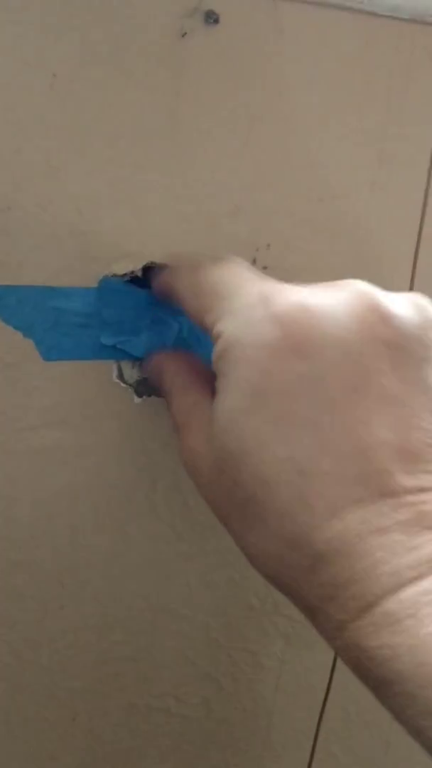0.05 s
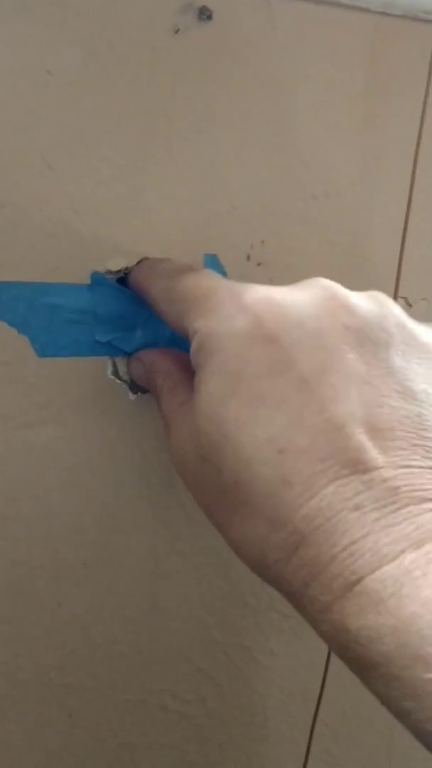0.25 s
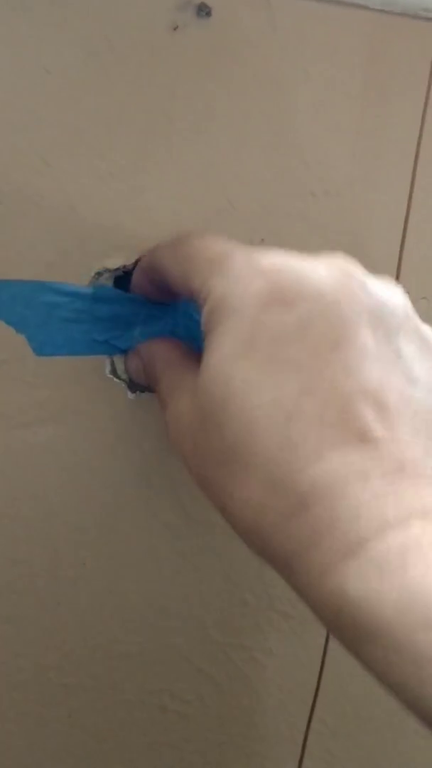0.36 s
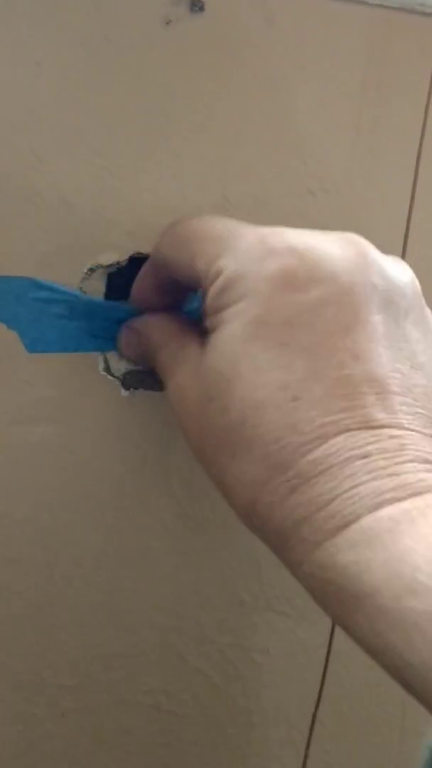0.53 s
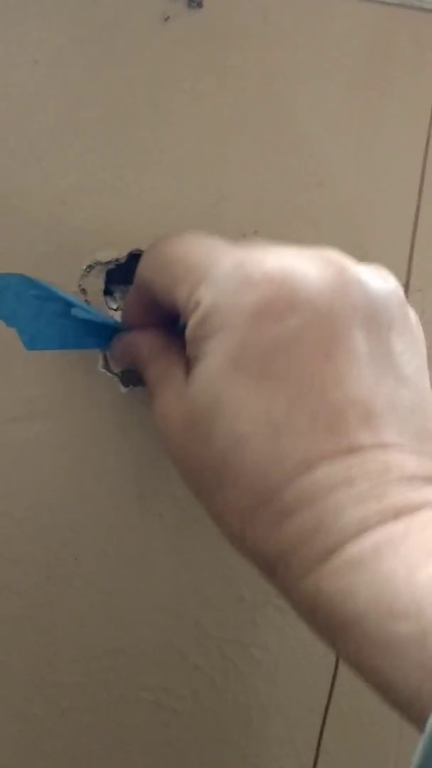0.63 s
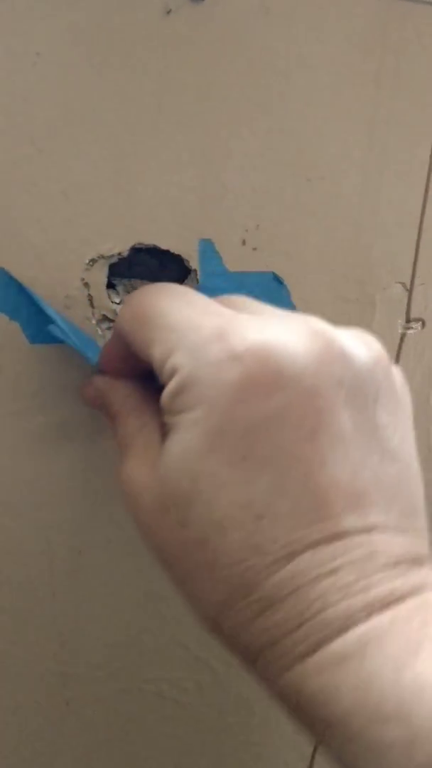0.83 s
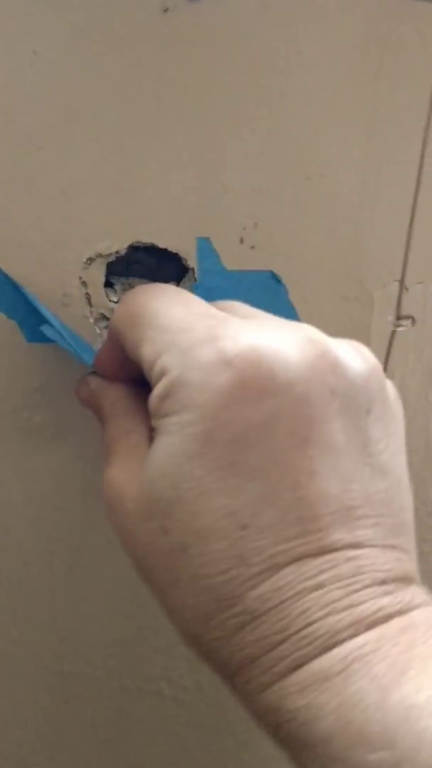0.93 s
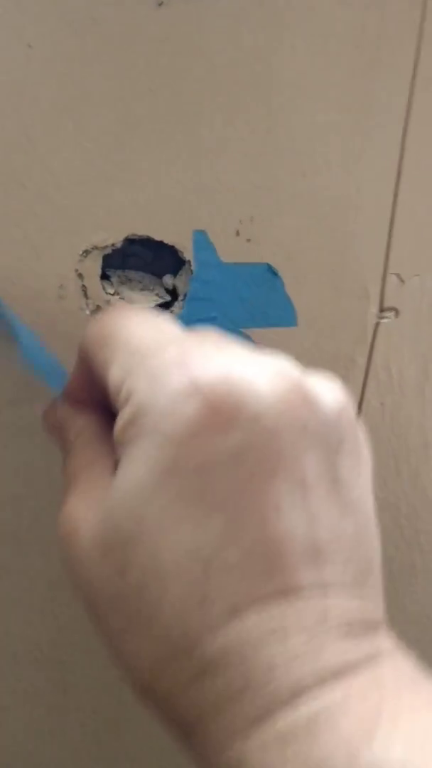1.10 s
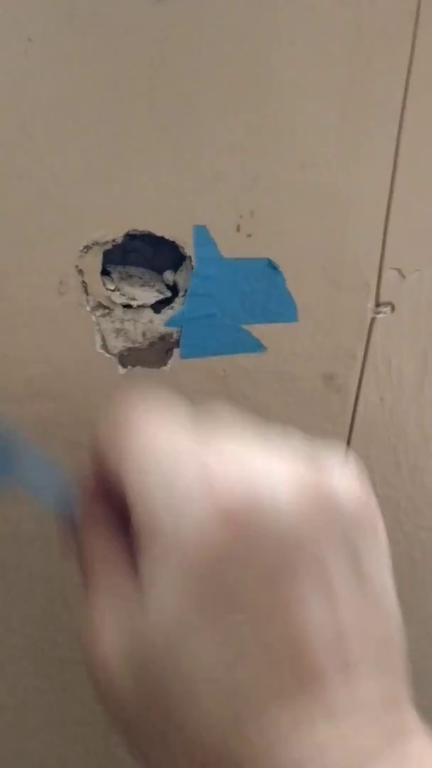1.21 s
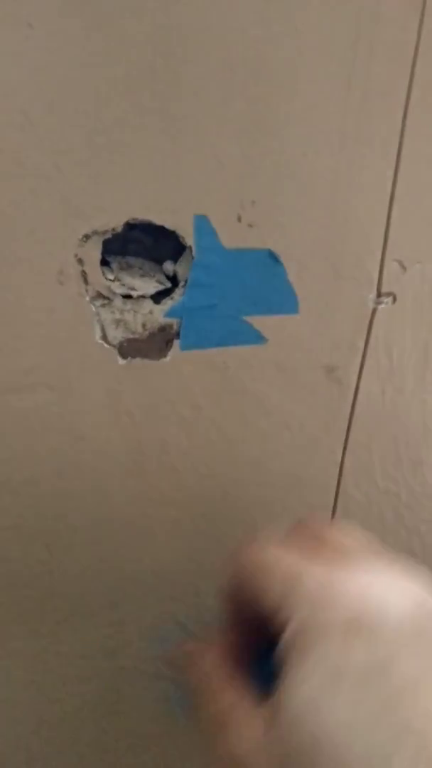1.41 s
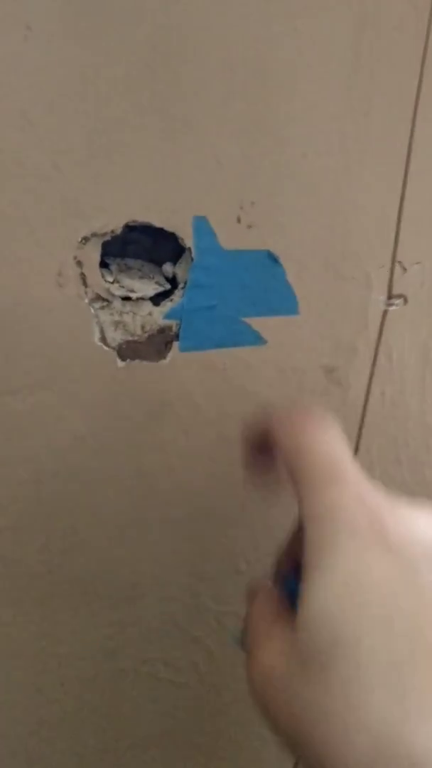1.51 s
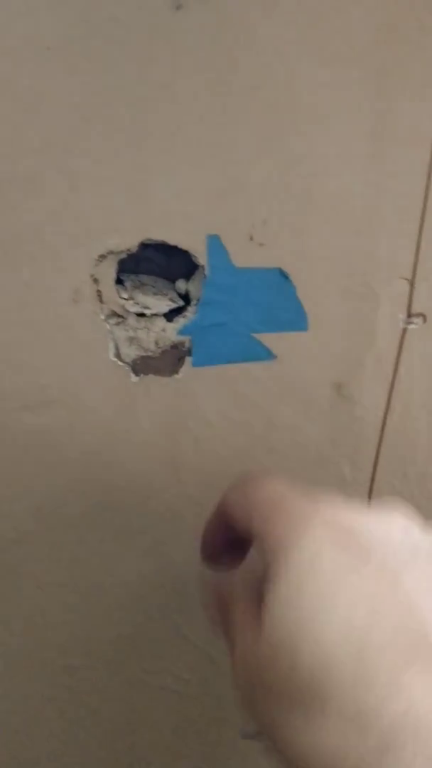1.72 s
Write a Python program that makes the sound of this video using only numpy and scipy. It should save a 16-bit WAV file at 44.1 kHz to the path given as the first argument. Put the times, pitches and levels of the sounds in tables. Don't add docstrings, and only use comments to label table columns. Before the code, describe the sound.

Close, dry tape peeling indoors: glue snaps and crackles in uneven bursts, the strip tears free loudest around the first third, smaller ticks thin out, a low bump follows, then the loose tape crackles in the hand.

```python
import sys
import numpy as np
from scipy import signal
from scipy.fft import rfft, irfft, next_fast_len
from scipy.io import wavfile
from scipy.ndimage import map_coordinates

SR = 44100
rng = np.random.default_rng(int(sys.argv[2]) if len(sys.argv) > 2 else 0)


def voltage_ratio(decibels):
    exponent = np.asarray(decibels, float) / 20
    return 10 ** exponent


def digitize_waveform(pressure):
    field = np.atleast_2d(pressure).T
    bounded = np.clip(field, -1, 1)
    quanta = np.round(bounded * 32767).astype(np.int16)
    wavfile.write(sys.argv[1], SR, quanta)


N = 77175

# start_s, peak_db, pitch_hz, tilt_db_per_octave
GLUE_SNAPS = [(0.012, -28.5, 15200, -15), (0.1204, -35, 7300, 17), (0.2154, -19, 7300, 0.5),
              (0.249, -21.5, 7060, 8.5), (0.3418, -14.5, 14200, 2.5), (0.3679, -18.5, 6470, 9),
              (0.404, -23.5, 7200, -7.5), (0.493, -17.5, 14100, 9), (0.5512, -15.5, 7340, 14),
              (0.5948, -18, 6800, 9), (0.6402, -26.5, 6900, -4), (0.6545, -28.5, 5400, 7),
              (0.6768, -26, 7300, 0), (0.6828, -27, 7100, 9), (0.6925, -38, 5540, -4),
              (0.7135, -29, 7150, 4), (0.7203, -31.5, 7150, -4), (0.7085, -24, 7200, 6),
              (0.7803, -28.5, 7200, -1), (0.7925, -25, 8300, 6), (0.8012, -31, 7140, -1),
              (0.805, -28, 7050, -7), (0.8112, -30, 13000, 9), (0.8152, -42, 5400, 4),
              (0.762, -40, 9500, 5), (0.8525, -24.5, 15200, 14), (1.141, -25, 7400, 5),
              (1.317, -32, 14900, -3.5), (1.4535, -20, 14000, 13), (1.4672, -26, 5400, -6),
              (1.4742, -30.5, 4900, -5), (1.4797, -21.5, 4800, -5.5), (1.4915, -12.5, 11600, -1),
              (1.495, -29, 7200, -3), (1.4075, -32, 5100, -7.5), (1.5555, -30, 5300, -5),
              (1.6702, -35.5, 5470, 5), (1.6845, -31, 5170, -5), (1.4305, -27, 5200, 2),
              (1.4595, -29, 5200, 2), (1.5046, -30, 7480, 1.5)]
# start_s, peak_db, pitch_hz, tilt_db_per_octave
EDGE_RIP = [
    (0.5606, -8.5, 5600, 8),
    (0.5612, -12.5, 6800, 3),
    (0.5628, -9, 6700, 0.5),
    (0.565, -22, 6840, -6),
    (0.574, -24, 6000, 0),
]
# start_s, peak_db, pitch_hz
STRIP_FLICKS = [(0.0149, -21.5, 3590), (0.2159, -27, 3610), (0.2988, -22, 3030), (0.3783, -23.5, 3140),
                (0.418, -21, 2910), (0.5656, -16.5, 3150), (0.597, -10, 3130), (0.6557, -21.5, 3280),
                (0.7543, -30, 3440), (0.8106, -17.5, 3360), (1.12, -14, 3430), (1.1666, -23, 3250),
                (1.3454, -68, 3040), (1.4264, -63, 3330), (1.5564, -40, 3820), (1.6698, -19, 2750),
                (1.6841, -18.5, 3160)]
# start_s, peak_db, pitch_hz
BOARD_KNOCKS = [(0.012, -41.5, 286), (0.118, -30, 326), (0.248, -32.5, 555), (0.262, -32.5, 332),
                (0.341, -33.5, 683), (0.358, -39.5, 745), (0.376, -34.5, 690), (0.402, -39.5, 820),
                (0.494, -40, 300), (0.558, -22, 306), (0.597, -44, 694), (0.714, -36.5, 1550),
                (0.799, -37.5, 1460), (0.851, -66, 443), (1.119, -36.5, 810), (1.14, -35, 450),
                (1.161, -23.5, 280), (1.317, -41, 1590), (1.344, -33.5, 1530), (1.383, -45.5, 850),
                (1.43, -35.5, 1430), (1.453, -33.5, 1400), (1.48, -37.5, 760), (1.555, -36.5, 1470),
                (1.67, -39.5, 670), (1.686, -40.5, 297), (1.744, -46, 810)]
# start_s, length_s, level_db, tilt_db_per_octave, growth_db
PEEL_RUNS = [(0, 0.085, -49, -9.5, -28), (0.109, 0.016, -50, 3, -7), (0.161, 0.041, -50, -0.5, 3),
             (0.227, 0.064, -47, -3.5, 11.5), (0.345, 0.038, -45.5, -6.5, 14),
             (0.395, 0.024, -47.5, -7.5, 16), (0.478, 0.061, -50.5, 1, -4.5),
             (0.566, 0.028, -45.5, -1.5, 3), (0.592, 0.053, -48, -5, 2), (0.637, 0.037, -50.5, -1.5, 6),
             (0.678, 0.021, -47, -1.5, 7), (0.701, 0.041, -50.5, -1.5, -3), (0.75, 0.081, -54, -2, 6),
             (0.834, 0.027, -56, -2, 17.5), (0.975, 0.13, -54.5, 0, 10.5), (1.102, 0.056, -50, -2, -2),
             (1.156, 0.048, -53, 1, -26), (1.297, 0.026, -46, 4.5, 14.5), (1.318, 0.05, -42.5, 4.5, -5.5),
             (1.374, 0.031, -51.5, 3.5, 12), (1.404, 0.032, -41.5, 1, 9), (1.445, .02, -38.5, -1, 4.5),
             (1.462, 0.032, -43, -2.5, 5), (1.497, 0.011, -56, -9, -6), (1.512, 0.066, -58.5, 0.5, -2),
             (1.574, 0.048, -53.5, 3, 1), (1.631, 0.075, -56.5, -5.5, 3), (1.724, 0.043, -48.5, -6, 41)]
# start_s, peak_db, pitch_hz, t60_s
KNUCKLE_THUDS = [(.018, -36, 202, 0.091), (.113, -30.5, 299, 0.063), (.25, -34, 294, 0.1),
                 (.27, -28, 250, 0.083), (.294, -25, 153.6, 0.16), (.364, -30, 210.5, .08),
                 (0.56, -24, 147, 0.12), (1.15, -26, 150, 0.088), (1.163, -23, 136, 0.086),
                 (1.189, -33, 108, .25), (.118, -37, 817, 0.037), (.118, -41, 414, .04),
                 (.25, -40.5, 570, 0.11), (1.161, -33.5, 798, 0.045), (1.161, -36, 1443, .05),
                 (1.16, -28.5, 274, 0.067)]
# time_s, level_db
RUB_PRESSURE = [(0.0, -50.5), (0.1, -53), (0.17, -50), (0.24, -40.5), (0.28, -39), (0.331, -49),
                (0.41, -48.5), (0.531, -63), (0.567, -44.5), (0.69, -54), (0.86, -62), (1.08, -51.5),
                (1.14, -41.5), (1.17, -42.5), (1.27, -52.5), (1.49, -58.5), (1.516, -67), (1.75, -57.5)]
# pitch_hz, width_hz, level_db
BOARD_MODES = [(107.6, 35, 8), (145.4, 47.6, 6.5), (237.7, 46, 3.5), (325, 72.3, -1), (524, 142, -13),
               (832, 108, -14.5), (1474, 210, -16)]
# pitch_hz, width_hz, level_db
KNOCK_MODES = [(150, 120, 5), (414, 230, -2.5), (770, 59, 8.5), (1566, 28, -4)]
# frequency_hz, level_db
PAPER_TONE = [(300, -12.5), (1000, -15.5), (2500, 4.5), (3300, 3.5), (5500, 2), (9000, 5), (13000, 4),
              (16000, 4)]
# frequency_hz, level_db
PORT_DIFFERENCE = [(100, -14), (500, -14), (1500, -2), (4000, -2), (6500, -3), (8000, -7), (11000, -6),
                   (16000, -7)]
# frequency_hz, level_db
HUSH_TONE = [(25, -7), (60, 22), (130, 14.5), (400, 3.5), (1200, -7.5), (3300, -6), (8000, -11.5),
             (16000, -14)]
# pitch_hz, width_hz, level_db
PORT_PEAKS = [(3300, 900, 2.5), (14800, 4000, 5), (7200, 700, 3)]

RUN_ATTACK_S, RUN_RELEASE_S = 0.0054, 0.0086
TICKS_PER_S, TICK_SHARE = 700, 0.33
BALL_START_S = 1.3
SNAP_LATE_S, KNOCK_LATE_S = 0.0004, 0.0016
ECHO_S, ECHO_DB = 0.0028, -10
THUD_SAG_PER_S, THUD_PUSH_S = 1.1, 0.0076
ROOM_T60_S, ROOM_DB, HUSH_DB = 0.2, -13, -55
PORT_LAG_S = 0.00002
CROSS_S, CROSS_GAIN, CROSS_TOP_HZ = 0.000462, 0.94, 7070
SHELF_HZ, SHELF_DB, TOP_HZ = 15900, -20, 16950


def unit(x):
    return x / np.sqrt(np.mean(x ** 2) + 1e-20)


def peak(x):
    return x / abs(x).max(1, keepdims=True)


def along(points, hz):
    f, v = np.transpose(points)
    return np.interp(np.log(hz + 1), np.log(f + 1), v)


def wobble(rate_hz):
    knots = rng.standard_normal(int(N * rate_hz / SR) + 4)
    return map_coordinates(knots, [np.arange(N) * rate_hz / SR])


def delayed(x, delay_s):
    return np.roll(x, round(delay_s * SR), axis=1)


def filtered(x, response):
    m = next_fast_len(x.shape[-1] + 8192)
    spectrum = rfft(x, m) * response(np.fft.rfftfreq(m, 1 / SR))
    return irfft(spectrum, m)[..., :x.shape[-1]]


def resonances(table):
    def response(f):
        total = 0
        for k, (hz, width_hz, db) in enumerate(table):
            damping = 1j * f * width_hz
            total = total + (-1) ** k * voltage_ratio(db) * damping / (hz * hz - f * f + damping)
        return total
    return response


def paper(f):
    return voltage_ratio(along(PAPER_TONE, f))


def bursts(table, t60_s, sharpness, ring_db, rise_s, body):
    out = np.zeros((2, N + SR))
    t = np.arange(4096) / SR
    envelope = voltage_ratio(-60 * t / t60_s) * (1 - np.exp(-t / rise_s))
    for start_s, db, hz, *tilt in table:
        burst = rng.standard_normal((2, len(t))) * envelope
        slope = np.clip(sum(tilt), -9, 9)
        wide = filtered(burst, lambda f: body(f) * voltage_ratio(slope * np.log2(f / 5000 + 0.012)))
        ring = filtered(burst, resonances([(hz, hz / sharpness, 0)]))
        mix = peak(peak(wide) + voltage_ratio(ring_db) * peak(ring))
        i = round(start_s * SR)
        out[:, i:i + len(t)] += voltage_ratio(db) * mix
    return out[:, :N]


def snaps():
    crack = bursts(GLUE_SNAPS, t60_s=0.004, sharpness=3, ring_db=-3, rise_s=0.00015, body=paper)
    crack = delayed(crack, SNAP_LATE_S)
    echo = delayed(crack[::-1], ECHO_S)
    return voltage_ratio(-2) * (crack + voltage_ratio(ECHO_DB) * echo)


def rip():
    def torn(f):
        low_cut = (f / 3500) ** 2 / (1 + (f / 3500) ** 2)
        return paper(f) * low_cut / (1 + (f / 9000) ** 4)
    return voltage_ratio(-6) * bursts(EDGE_RIP, t60_s=0.0086, sharpness=6.4, ring_db=2, rise_s=0.00034, body=torn)


def flicks():
    return voltage_ratio(-16) * bursts(STRIP_FLICKS, t60_s=0.012, sharpness=11.7, ring_db=0, rise_s=0.0022, body=paper)


def peel():
    t, out = np.arange(N) / SR, np.zeros((2, N))
    struck = rng.random(N) < TICKS_PER_S / SR * voltage_ratio(5 * wobble(90))
    ticks = struck * np.clip(voltage_ratio(8.6 * rng.exponential(size=N)), 0, 9)
    ticks = unit(signal.lfilter([1], [1, -0.9], ticks))
    grain = rng.standard_normal((2, N)) * (voltage_ratio(1.7 * wobble(150)) + TICK_SHARE * ticks)
    ball = resonances([(4900, 970, 7.8)])
    for start_s, length_s, db, tilt, growth_db in PEEL_RUNS:
        on = slice(round(start_s * SR), round((start_s + length_s + 8 * RUN_RELEASE_S) * SR))
        age_s = t[on] - start_s
        attack = np.clip(age_s / RUN_ATTACK_S, 0, 1)
        release = np.exp(-np.clip(age_s - length_s + RUN_RELEASE_S, 0, 9) / RUN_RELEASE_S)

        def tone(f):
            tilted = paper(f) * voltage_ratio(tilt * np.log2(f / 5000 + 0.01))
            return tilted * (1 + (start_s > BALL_START_S) * ball(f))

        level = voltage_ratio(db + growth_db * (age_s / length_s - 0.5))
        out[:, on] += level * attack * release * unit(filtered(grain[:, on], tone))
    return out


def knocks():
    knock = bursts(BOARD_KNOCKS, t60_s=0.01, sharpness=4.8, ring_db=12, rise_s=0.00016,
                   body=resonances(KNOCK_MODES))
    return voltage_ratio(-4.5) * delayed(knock, KNOCK_LATE_S)


def thuds():
    out, t = np.zeros(N + SR), np.arange(SR // 4) / SR
    push = 1 - np.exp(-t / THUD_PUSH_S)
    for start_s, db, hz, t60_s in KNUCKLE_THUDS:
        swing = np.sin(2 * np.pi * hz * (t - THUD_SAG_PER_S * t ** 2 / 2))
        i = round(start_s * SR)
        out[i:i + len(t)] += voltage_ratio(db - 60 * t / t60_s) * push * swing
    return out[:N]


def rub():
    time_s, db = np.transpose(RUB_PRESSURE)
    drag = unit(filtered(rng.standard_normal((2, N)), resonances(BOARD_MODES)))
    return voltage_ratio(np.interp(np.arange(N) / SR, time_s, db) + 2.5 * wobble(30.39)) * drag


def ports(x):
    t = np.arange(SR // 3) / SR
    tail = rng.standard_normal((2, len(t))) * voltage_ratio(-60 * t / ROOM_T60_S)
    tail = voltage_ratio(ROOM_DB) * tail / np.linalg.norm(tail[0])
    room = signal.fftconvolve(x[:1], tail, axes=1)[:, :N]
    lag_s = np.array([[PORT_LAG_S], [0]])
    shared = filtered(x[0], lambda f: np.exp(-2j * np.pi * f * lag_s))
    own = filtered(x[1], lambda f: voltage_ratio(along(PORT_DIFFERENCE, f))) * np.array([[1], [-1]])
    return shared + own + filtered(room, lambda f: f / (f + 1500))


def hush():
    air = filtered(rng.standard_normal((2, N)), lambda f: voltage_ratio(along(HUSH_TONE, f)))
    own = filtered(air[1], lambda f: (f + 60) / (f + 500))
    return voltage_ratio(HUSH_DB + 0.22 * wobble(13.6)) * unit(np.array([air[0] + own, air[0] - own]))


def scene():
    tape = snaps() + rip() + flicks() + peel()
    wall = knocks() + thuds() + rub()
    return ports(tape + wall) + hush()


def band_limit(x):
    return signal.sosfilt(signal.butter(12, 16980, fs=SR, output="sos"), x)


def record(dry):
    def cross(f):
        delay = np.exp(-2j * np.pi * f * CROSS_S)
        return CROSS_GAIN * delay / np.sqrt(1 + (f / CROSS_TOP_HZ) ** 12)

    def colour(f):
        peaks = 1
        for hz, width_hz, db in PORT_PEAKS:
            peaks = peaks + (voltage_ratio(db) - 1) / (1 + ((f - hz) / width_hz * 2) ** 2)
        low_cut = f ** 2 / (f ** 2 + 40 ** 2)
        shelf = np.where(f > SHELF_HZ, voltage_ratio(SHELF_DB), 1)
        return peaks * low_cut * shelf * (f < TOP_HZ)

    mix = filtered(dry - filtered(dry[::-1], cross), colour)
    return band_limit(mix)


dry = scene()
out = record(dry)
digitize_waveform(out)
```